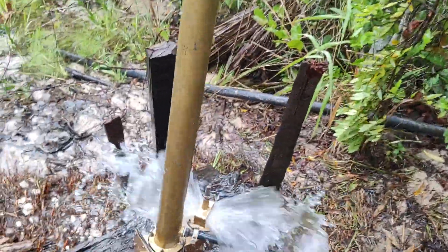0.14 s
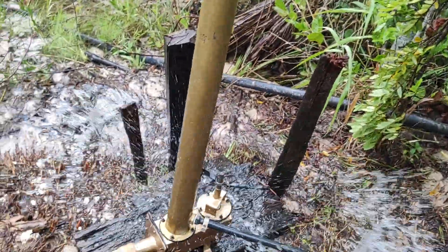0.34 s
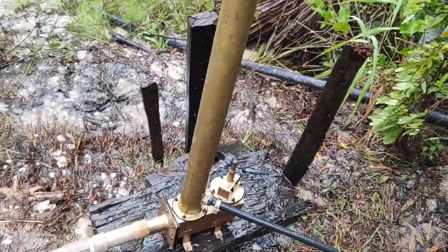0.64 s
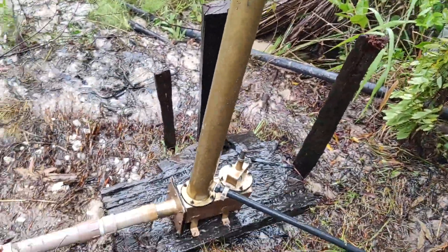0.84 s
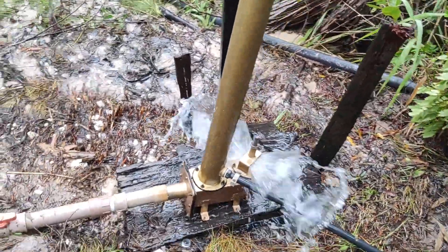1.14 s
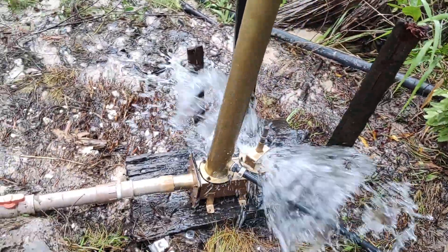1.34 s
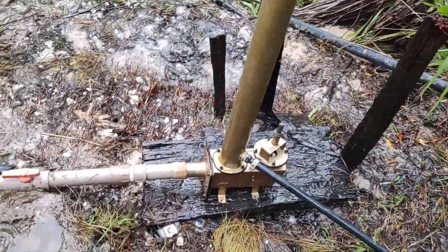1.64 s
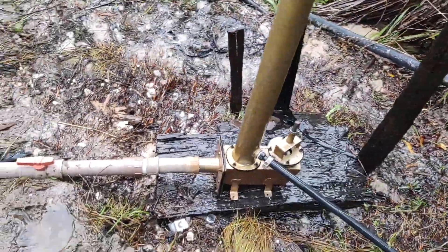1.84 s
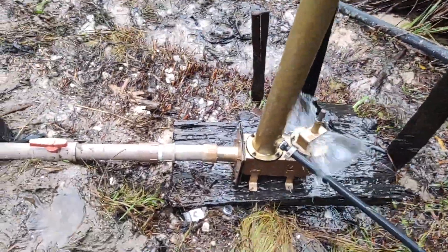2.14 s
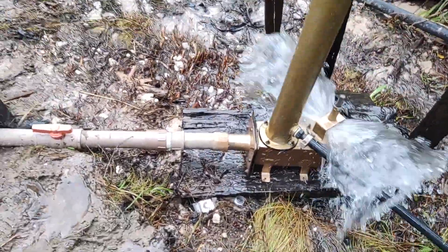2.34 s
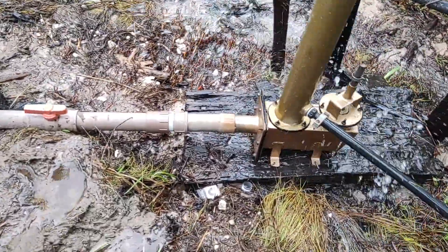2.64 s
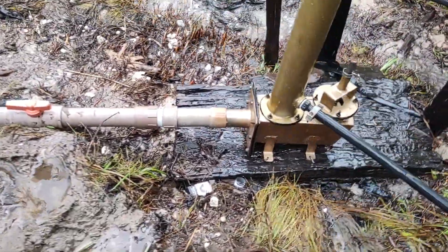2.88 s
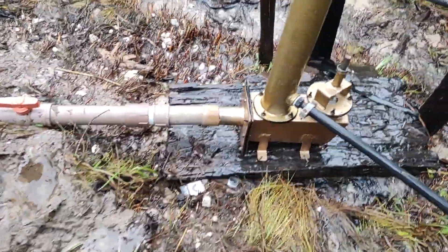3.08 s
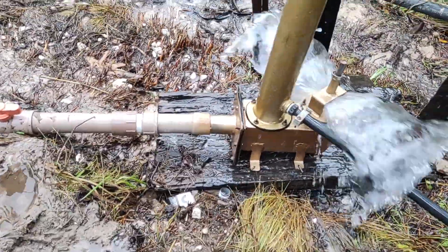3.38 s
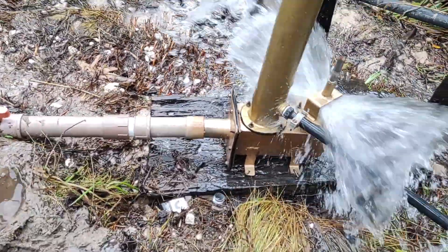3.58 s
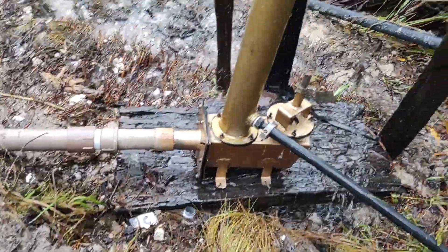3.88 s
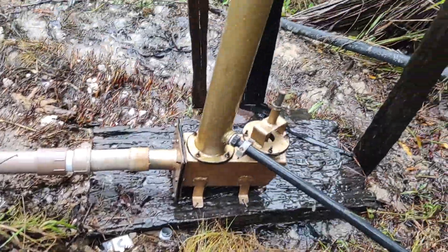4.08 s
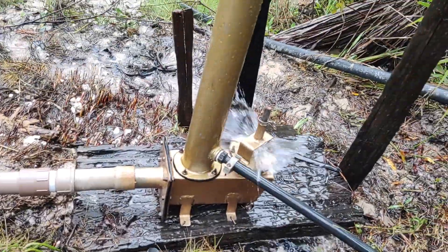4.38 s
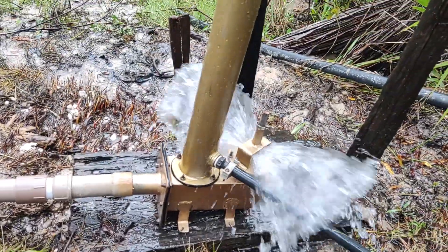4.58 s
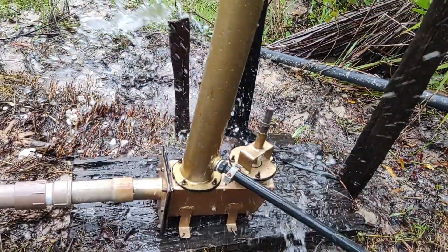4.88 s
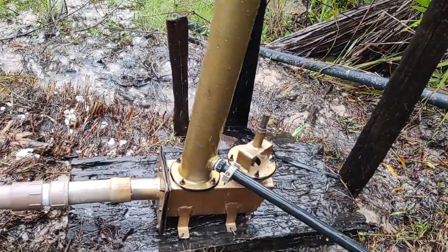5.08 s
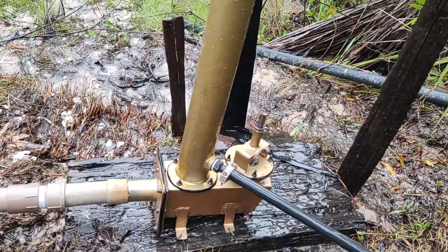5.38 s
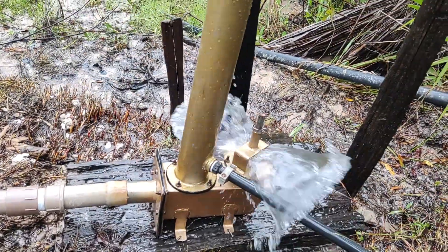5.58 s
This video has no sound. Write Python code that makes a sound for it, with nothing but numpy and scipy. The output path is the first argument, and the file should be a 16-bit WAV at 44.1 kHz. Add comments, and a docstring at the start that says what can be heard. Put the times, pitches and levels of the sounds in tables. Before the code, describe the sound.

A water-driven pump outdoors beats steadily, each cycle a gush of water, a heavy metallic slam, a sharp clack and softening knocks.

```python
"""A hydraulic ram pump beats on wet ground outdoors, about once in 1.13 s.
In each beat water gushes from the waste valve until it slams shut (water hammer); the delivery valve thumps;
the waste valve clacks open, bounces on a pocket of water and lands; the pressure wave then runs to and fro in
the drive pipe, its returns ever sooner and softer. The first return squirts water that splatters down while the
gush builds again. Blows are shaped noise, modes and gliding pockets; water is coloured noise with bubbles."""
import sys
import numpy as np
from scipy import signal
from scipy.fft import rfft, irfft, next_fast_len
from scipy.io import wavfile
from scipy.ndimage import uniform_filter1d, minimum_filter1d, map_coordinates

SR = 44100
rng = np.random.default_rng(int(sys.argv[2]) if len(sys.argv) > 2 else 0)


def wav_record(signal):
    """Record a signal, one row per channel, as 16-bit PCM in the file named by sys.argv[1]."""
    frames = np.transpose(np.atleast_2d(signal))
    bounded = np.clip(frames, -1, 1)
    # unit amplitude maps onto the largest positive 16-bit level
    quanta = np.round(bounded * 32767).astype(np.int16)
    wavfile.write(sys.argv[1], SR, quanta)


N = 252252

# Levels here are reference levels: the functions offset them for the layers of each event.
# waste valve slams shut: start_s, level_db, brightness_db, shake_db (body and plank),
# splash_db and spray_db (strength of this beat's jet), pipe_ring_db
SLAM_EVENTS = [(0.3806, -24, 1.5, -23.5, 2.5, -4, -65), (1.4952, -27.5, -3, -37.5, -.5, -3.5, -63),
               (2.6386, -23, -6, -19, 1.5, -1.5, -54.5), (3.762, -24, 0.5, -34.5, 5, 3.5, -72),
               (4.8973, -21, 0.2, -24, 1.5, 3, -48.5)]
# waste valve drops open on its stop, then bounces once:
# start_s, level_db, brightness_db, bounce_knock_db, bounce_pocket_hz, bounce_pocket_db
CLACK_EVENTS = [(.648, -23.5, 7.5, -33.5, 884, -23.5), (1.764, -25.5, 1.5, -33.5, 930, -33),
                (2.9096, -24.5, -3.5, -29, 832, -19), (4.0256, -24, -4.5, -28.5, 930, -26),
                (5.1637, -25.5, 1, -29.5, 684, -26)]
# valve lands for good and starts the pressure wave: start_s, knock_db, brightness_db, pocket_db
LANDING_EVENTS = [(-.426, -21, 2, -22), (0.7399, -19.5, 4.5, -25.5), (1.8425, -17, 0.5, -21.5),
                  (3.0013, -21, 0, -20.5), (4.1074, -19.5, 0, -22), (5.2564, -20, 4.5, -17.5)]
# first return of the wave along the drive pipe, one row per landing:
# start_s, knock_db, pocket_hz, pocket_over_knock_db
FIRST_RETURN_EVENTS = [(-.252, -31, 800, 2), (0.914, -30.5, 690, -8), (2.0125, -32.5, 824, 3),
                       (3.176, -30, 626, -10), (4.2763, -29.5, 692, -1), (5.43, -30.5, 1110, -5)]
# biggest splats of water: start_s, level_db, pitch_hz
SPLAT_EVENTS = [(0.01, -44.5, 2070), (0.323, -43.5, 3580), (0.769, -35.5, 950), (1.089, -40.5, 820),
                (1.131, -38, 1450), (1.71, -36, 2100), (2.216, -44, 776), (2.239, -43, 976),
                (2.424, -43.5, 3370), (2.938, -40, 1140), (3.208, -41.5, 830), (3.349, -39.5, 3250),
                (3.929, -40, 3300), (3.975, -32.5, 1370), (4.476, -41.5, 1180), (4.5, -42.5, 1100),
                (4.52, -39.5, 730), (5.636, -36.5, 1104), (5.67, -34.5, 2425)]
# drops that land close by: start_s, level_db
DROP_EVENTS = [(2.238, -47.5), (2.7204, -45), (3.063, -48), (4.3846, -54), (4.5024, -48.5), (4.9814, -56)]

# spectral colour of each kind of blow: frequency_hz, level_db (relative, per Hz)
SLAM_COLOUR = [(40, -69), (100, -15.5), (220, -10.5), (290, -0.5), (430, -7), (950, 1), (1500, -7),
               (2600, -9), (4200, -9), (5700, -33), (13500, -31), (15500, -30)]
CLACK_COLOUR = [(50, -29), (190, -20.5), (330, 7), (430, -7.5), (750, -2), (1300, -7), (1900, -3.5),
                (2600, -11.5), (3300, 0.5), (4400, -13.5), (5700, -33), (13500, -38), (15500, -31)]
BOUNCE_COLOUR = [(40, -36), (140, -10), (330, 2), (480, -5), (900, 5.5), (1400, -7.5), (2050, 0.5),
                 (2700, -13.5), (4200, -15), (5400, -37), (9000, -50.5), (15500, -57)]
RETURN_COLOUR = [(50, -46), (150, -9.5), (290, 1), (470, -5), (750, 0), (1150, -1.5), (1400, -11),
                 (2100, -9), (2600, -16), (4200, -19.5), (5500, -44.5), (15500, -51)]
PINCH_COLOUR = [(200, -29), (900, 0), (4300, 8.0), (5700, -16), (13500, -13), (15300, -17)]
PLANK_COLOUR = [(30, -23), (70, -12), (120, -3.0), (190, 0.0), (400, -26), (1000, -36)]
THUMP_COLOUR = [(60, -42), (350, -6.5), (700, -1.0), (2000, -12.5), (4000, -14), (5700, -44.0)]
SPATTER_COLOUR = [(300, -21), (800, 3.5), (1600, -0.5), (3500, -2.0), (4700, -9.5), (5700, -32), (15000, -30)]
SPLAT_COLOUR = [(100, -16.0), (700, -3), (1200, 0), (4000, -1), (5700, -29.5), (15000, -34)]
DROP_COLOUR = [(500, -29), (2000, 6.5), (4200, 8.5), (5700, -9), (9000, -5.0), (15500, -12)]
# churned water in the valve: frequency_hz, level_db (relative, per Hz)
SLOSH_COLOUR = [(100, -53), (450, -17.5), (680, -4), (860, 0), (1080, -4.5), (1400, -11.5), (2200, -15.5),
                (4200, -27.5), (5500, -65), (15000, -69)]
# share of a blow's brightness at each frequency: frequency_hz, share
HARDNESS = [(600, 0), (2500, 1)]

# spectral colour of the running water: frequency_hz, level_db (relative, per Hz)
GURGLE_COLOUR = [(25, -45), (70, -22), (130, -10), (260, -1), (400, -4), (700, 2), (1000, 0), (1500, -23),
                 (2500, -30), (5000, -90)]
SPLASH_COLOUR = [(500, -39), (1100, 5), (1600, -6.5), (2400, -2.5), (3300, 4.5), (4400, 5.5), (5000, -2),
                 (5700, -9), (8000, -18.5)]
SPRAY_COLOUR = [(3060, -23), (5200, -23), (5640, -17.5), (6750, -11), (8370, 0.5), (13000, -2.5),
                (15200, 2.5), (15800, 6), (16200, -10)]
MIST_COLOUR = [(11000, -43), (14000, -17), (15000, 0), (15900, -4), (16400, -25)]
# water trickling away between the beats: frequency_hz, level_db (relative, per Hz)
TRICKLE_COLOUR = [(25, -42), (90, -11), (250, -2), (500, -3.5), (900, 1.5), (1500, -9.5), (3500, -4.5),
                  (4500, -10), (5500, -19.5), (7000, -16), (8000, -22.5), (11000, -35), (15500, -31)]

# modes of the pump body, then of the valve: frequency_hz, level_db, t60_s
BODY_MODES = [(510, -26, 0.25), (552, -12.5, 0.51), (777, -15, 0.083), (807, -15, 0.61)]
VALVE_MODES = [(522, -23.5, 0.7), (566, -10.5, 0.3), (1162, 0.5, 0.14), (1220, -57, 0.035),
               (1277, -5.5, 0.092)]
# stereo width of blows, then of water: frequency_hz, side_over_mid_db
BLOW_SIDE = [(100, -22), (700, -5), (1500, -2.5), (3500, -1), (8000, 0.5)]
WATER_SIDE = [(100, -14), (400, -10), (1000, -4.5), (3000, 0), (8000, 0)]
# decay of the yard's echo: frequency_hz, t60_s
YARD_DECAY = [(100, 0.15), (800, 0.1), (3000, 0.21), (10000, 0.13)]
# treble balance of the microphone ports: frequency_hz, left_minus_right_db
PORT_BALANCE = [(4000, 0), (6000, 0), (8500, 6.0), (10500, -0.5), (13000, -3.5), (16000, -1)]

# each part of the gush swells to full flow, holds, then dies:
# level_db, swell_db_per_s, hold_end_s (after the slam), fall_db_per_s
GURGLE_GUSH = (-52.5, 17.5, 0.19, 144)
SPLASH_GUSH = (-44, 53, 0.3937, 157)
SPRAY_GUSH = (-55, 75, 0.32, 113)
FULL_FLOW_S = 0.054  # before the slam
CHURN_DB, CHURN_LEAD_S, CHURN_SPREAD_S = -38, 0.017, 0.039  # water churns just before the valve lands
SPRAY_FLUTTER_DB, SPRAY_PATCHY_DB = 1.5, 1.6

BLOW_S = .025  # a blow's level is its energy spread over this time
PIPE_HZ, PIPE_T60_S = 516.8, 4.3
THUMP_AFTER_S = .1505  # one trip of the pressure wave after the slam
THUMP_DB, THUMP_RING_DB = -35, -44
CRACK_DB = -11  # first instant of a clack, against the whole blow
CLACK_RING_DB = -20.5
BOUNCE_AFTER_S, BOUNCE_BRIGHT_DB = .0475, 0.2  # delay after the clack
LANDING_POCKET_HZ = 817.4

RETURN_COUNT = 4
ROUND_TRIP_S, GAP_SHRINK = .127, .67  # the gap between returns shrinks towards the pipe's round trip
RETURN_LOSS_DB = 7.5  # for each doubling of the number of trips
RETURN_BRIGHT_DB, RETURN_DULLING_DB = -1, 9  # first knock; treble lost on each trip
RETURN_POCKET_HZ = 728  # of the later returns
LATER_POCKET_DB, POCKET_LOSS_DB = -9, 3.5  # later pockets over their knock; extra loss on each trip
SPATTER_LOSS_DB = 1.5  # extra loss on each trip

SHOWER_AFTER_S, SHOWER_SPREAD_S = .385, .026  # the squirt comes down, after the valve lands
SHOWER_DB, SHOWER_SPLAT_DB, SHOWER_DROP_DB = -50.5, -45.5, -55
SPLAT_HZ, SPLAT_SCATTER_OCT, SPLAT_SWELL_S = 1698, 0.713, 0.0018
STRAY_SPLAT_DB, STRAY_SPLAT_HZ = -49.5, 3260  # lesser ones fall at any time
WET_SCATTER_DB = 1.5  # random spread of small splats and drops

PEAK_LIMIT = 0.7  # peaks above this are turned down
TOP_HZ = 16250  # band limit


def amp(db):
    """Decibel law: level to amplitude ratio."""
    return 10 ** (np.asarray(db) / 20)


def unit(x):
    """Normalisation to rms 1."""
    return x / np.sqrt(np.mean(x ** 2) + 1e-20)


def sized(x, db):
    """Energy scaling: the blow's energy, spread over BLOW_S, has this level."""
    energy = np.mean(np.sum(x ** 2, axis=-1))
    return amp(db) * x / np.sqrt(energy / (BLOW_S * SR) + 1e-20)


def along(points, hz):
    """Interpolation of (frequency, value) points on a logarithmic axis."""
    f, v = np.transpose(points)
    return np.interp(np.log(hz + 1), np.log(f + 1), v)


def wobble(rate):
    """Band-limited random fluctuation: a smooth curve with rate knots a second."""
    knots = rng.standard_normal(int(N * rate / SR) + 4)
    return map_coordinates(knots, [np.arange(N) * rate / SR])


def clock(size=8192):
    """Conjugate time and frequency axes of one short event."""
    return np.arange(size) / SR, np.fft.rfftfreq(size, 1 / SR)


def add(track, s, x):
    """Superposition: mix x into the track at time s."""
    start = round(s * SR)
    if 0 <= start < N:
        track[:, start:start + x.shape[-1]] += x[..., :N - start]


def filtered(x, response):
    """Linear filtering: the spectrum of x times a response of frequency."""
    m = next_fast_len(N + SR // 2)
    return irfft(rfft(x, m) * response(np.fft.rfftfreq(m, 1 / SR)), m)[..., :N]


def causal(gain):
    """Minimum phase: the response with this gain that rings only after its cause."""
    cepstrum = irfft(np.log(np.maximum(gain, 1e-6)))
    half = cepstrum.shape[-1] // 2
    cepstrum[..., 1:half] *= 2
    cepstrum[..., half + 1:] = 0
    return np.exp(rfft(cepstrum))


def left_right(mid, side):
    """Sum and difference stereo, decoded to left and right."""
    return np.array([mid + side, mid - side])


def burst(colour_db, db, swell, tail_db, tail_t60):
    """Impact noise: a stereo cluster of tiny hits swells and dies, ringing with the given colour."""
    t, hz = clock()
    swell = max(swell, 1e-4)
    onset = t / swell * np.exp(1 - t / swell)
    tail = amp(tail_db - 60 * t / tail_t60) * (1 - np.exp(-t / swell))
    hits = rfft((onset + tail) * rng.standard_normal((2, len(t))))
    # flatten the broad spectrum of the hits before colouring them
    broad = np.sqrt(np.abs(uniform_filter1d(np.abs(hits) ** 2, size=50, axis=1)) + 1e-9)
    width = amp([0 * hz, along(BLOW_SIDE, hz)])
    mid, side = irfft(hits * causal(amp(colour_db) / broad) * width)
    return left_right(mid, side) * amp(db) / np.sqrt(np.sum(mid ** 2) / (BLOW_S * SR))


def knock(colour, db, bright_db, swell, tail_db, tail_t60):
    """Contact stiffness: a harder blow on the pump lifts the treble."""
    _, hz = clock()
    colour_db = along(colour, hz) + bright_db * along(HARDNESS, hz)
    return burst(colour_db, db, swell, tail_db, tail_t60)


def pocket(hz, db, swell, glide):
    """Bubble resonance: an air pocket swells into a short note, rising as it shrinks."""
    t, _ = clock()
    u = t / swell
    pitch = hz * (1 + glide * np.tanh((u - 1) / 2))
    tone = np.sin(2 * np.pi * np.cumsum(pitch) / SR)
    return sized(u ** 2 * np.exp(-2 * u) * tone, db)


def ring(modes, db):
    """Modal vibration: damped metal modes, struck at slightly new strengths each time."""
    t = np.arange(SR) / SR
    total = np.zeros(SR)
    for hz, level, t60 in modes:
        decay = amp(db + level + rng.normal() - 60 * t / t60)
        total += decay * np.sin(2 * np.pi * (hz * t + rng.random()))
    return total * (1 - np.exp(-t / 0.0011))


def bubbles(rate, centre_hz, spread, cycles, size_db, size=400):
    """Damped bubble oscillation: a stereo rain, rms 1; spread in octaves each way, cycles to decay."""
    count = int(rate * N / SR)
    when, pitch, strength, place = rng.random((count, 4)).T[:, :, None]
    t = np.arange(size) / SR
    turns = centre_hz * 2 ** (spread * (2 * pitch - 1)) * t
    strengths = amp(-size_db * np.log(np.maximum(strength, .01)))
    grains = strengths * np.exp(-turns / cycles) * np.sin(2 * np.pi * turns)
    index = ((when * N).astype(int) + np.arange(size)).ravel()
    mid_gain = np.cos(place * np.pi / 2)
    side_gain = np.sin(place * np.pi / 2) * rng.choice([-1, 1], (count, 1))
    return unit(np.array([np.bincount(index, (grains * g).ravel(), N)[:N] for g in (mid_gain, side_gain)]))


def water(colour, grains, grain_db, patchy_db):
    """Turbulence: rushing noise, patchy in time and frequency, with bubbles on it; mid rms 1."""
    z = signal.stft(rng.standard_normal((2, N)), nperseg=512)[2]
    field = uniform_filter1d(rng.standard_normal(z.shape[1:]), size=7, axis=0)
    field = uniform_filter1d(field, size=4, axis=1)
    rush = unit(signal.istft(z * amp(patchy_db * unit(field)), nperseg=512)[1][:, :N])

    def response(hz):
        return amp(along(colour, hz)) * amp([0 * hz, along(WATER_SIDE, hz)])

    mid, side = filtered(rush + amp(grain_db) * grains, response)
    return left_right(mid, side) / np.std(mid)


def flow(level_db, swell_db_per_s, hold_s, fall_db_per_s, splash_share=0, spray_share=0):
    """Power summation over all beats: the gain of one part of the gush swells, holds and falls."""
    power = np.zeros(N)
    for s, *_, splash_db, spray_db, _ in SLAM_EVENTS:
        t = np.arange(N) / SR - s
        sag_db = swell_db_per_s * np.maximum(-t - FULL_FLOW_S, 0) + fall_db_per_s * np.maximum(t - hold_s, 0)
        power += amp(level_db + splash_share * splash_db + spray_share * spray_db - sag_db) ** 2
    return np.sqrt(power)


def surge(db, after_s, spread_s):
    """Gaussian pulse: gain of a surge of water, timed from each landing of the valve."""
    t = np.arange(N) / SR
    return amp(db) * sum(np.exp(-.5 * ((t - s - after_s) / spread_s) ** 2) for s, *_ in LANDING_EVENTS)


def shower(count):
    """Normal scatter: random times at which count blobs of each squirt come down."""
    falls = [s + SHOWER_AFTER_S + SHOWER_SPREAD_S * rng.standard_normal(count) for s, *_ in LANDING_EVENTS]
    return np.concatenate(falls)


def strays(count):
    """Stratified chance: random times spread loosely over the whole scene."""
    return (np.arange(count) + rng.random(count)) / count * N / SR


def yard(x):
    """Diffuse reverberation: ground and bushes scatter a short answer."""
    hz, t, z = signal.stft(rng.standard_normal((2, SR // 3)), SR, nperseg=256)
    decay = amp(-60 * t / along(YARD_DECAY, hz)[:, None])
    tail = signal.istft(z * decay, SR, nperseg=256)[1]
    late = np.pad(x, ((0, 0), (SR // 125, 0)))  # 8 ms later
    return signal.fftconvolve(late, tail / np.linalg.norm(tail[0]), axes=1)[:, :N]


def trickle():
    """Bubble noise: spilled water keeps running and dripping off the plank."""
    drips = bubbles(300, centre_hz=2235, spread=1.256, cycles=5.6, size_db=5.5)
    return amp(-56.5 + wobble(26)) * water(TRICKLE_COLOUR, drips, grain_db=-9.0, patchy_db=3.5)


def drops():
    """Drop impact: a near drop lands with a thin tick; fainter ones fall in the showers."""
    out = np.zeros((2, N))
    faint = [(s, SHOWER_DROP_DB + WET_SCATTER_DB * rng.normal()) for s in shower(count=2)]
    for s, db in DROP_EVENTS + faint:
        add(out, s, knock(DROP_COLOUR, db, 0, swell=0.0012, tail_db=-4, tail_t60=0.061))
    return out


def pipe_ring():
    """Light damping: each slam strikes one mode of the pipe, which sings on until the next."""
    t = np.arange(N) / SR
    gain = np.zeros(N)
    for s, *_, ring_db in SLAM_EVENTS:
        gain = np.where(t < s, gain, amp(ring_db - 60 * np.abs(t - s) / PIPE_T60_S))
    gain = np.sqrt(2) * uniform_filter1d(gain, size=441) * amp(1.6 * wobble(9.8))
    return gain * np.sin(2 * np.pi * PIPE_HZ * t)


def splats():
    """Entrained bubbles: each spit or landing blob gives a short splash and a rising note."""
    out = np.zeros((2, N))
    _, hz = clock()
    wet = along(SPLAT_COLOUR, hz)
    small = [(s, SHOWER_SPLAT_DB, SPLAT_HZ) for s in shower(count=3)]
    small += [(s, STRAY_SPLAT_DB, STRAY_SPLAT_HZ) for s in strays(count=16)]
    scattered = []
    for s, db, pitch_hz in small:
        octaves = SPLAT_SCATTER_OCT * rng.uniform(-1.014, 1)
        scattered.append((s, db + WET_SCATTER_DB * rng.normal(), pitch_hz * 2 ** octaves))
    for s, db, pitch_hz in SPLAT_EVENTS + scattered:
        bubble_db = 13 * np.exp(-(np.log2((hz + 1) / pitch_hz) / 0.31) ** 2)
        add(out, s - .001, burst(wet + bubble_db, db - 2.0, SPLAT_SWELL_S, tail_db=-11, tail_t60=0.11))
        add(out, s, pocket(pitch_hz, db - 8.5, swell=0.0036, glide=0.19))
    return out


def gush():
    """Jet break-up: water gurgles at the valve, splashes on the ground and turns to spray and mist."""
    low = np.hypot(flow(*GURGLE_GUSH), surge(CHURN_DB, -CHURN_LEAD_S, CHURN_SPREAD_S))
    falling = surge(SHOWER_DB, SHOWER_AFTER_S, SHOWER_SPREAD_S)
    middle = np.hypot(flow(*SPLASH_GUSH, splash_share=0.33), falling)
    # a stronger jet makes finer mist: the top grows faster with its strength
    high = flow(*SPRAY_GUSH, spray_share=0.64)
    top = flow(*SPRAY_GUSH, spray_share=1.5)
    flutter = wobble(45)  # shared by splash, spray and mist

    glugs = bubbles(250, centre_hz=802, spread=1.05, cycles=8.4, size_db=4.5)
    gurgle = water(GURGLE_COLOUR, glugs, grain_db=-17.0, patchy_db=5.0)
    gurgle = low * amp(-0.5 + 0.49 * wobble(24)) * gurgle

    fizz = bubbles(1200, centre_hz=2700, spread=.9, cycles=3, size_db=4)
    splash = water(SPLASH_COLOUR, fizz, grain_db=-3.5, patchy_db=3.5)
    splash = middle * amp(-1.0 + 2.9 * flutter) * splash

    droplets = bubbles(1400, centre_hz=8700, spread=1.0, cycles=0.94, size_db=6.5)
    spray = water(SPRAY_COLOUR, droplets, grain_db=-4.0, patchy_db=SPRAY_PATCHY_DB)
    spray = high * amp(-.7 + SPRAY_FLUTTER_DB * wobble(130) + 0.89 * flutter) * spray

    specks = bubbles(500, centre_hz=14500, spread=0.13, cycles=3.3, size_db=8)
    mist = water(MIST_COLOUR, specks, grain_db=-5, patchy_db=0.0)
    mist = top * amp(-12 + 1.5 * flutter) * mist
    return gurgle + splash + spray + mist


def returns():
    """Wave reflection: each return comes sooner and knocks softer and duller, with a weaker spatter."""
    out = np.zeros((2, N))
    for (landing_s, *_), (s, first_db, first_hz, pocket_over_db) in zip(LANDING_EVENTS, FIRST_RETURN_EVENTS):
        gap_s = s - landing_s
        for trip in range(RETURN_COUNT):
            db = first_db - RETURN_LOSS_DB * np.log2(trip + 1)
            bright_db = RETURN_BRIGHT_DB - RETURN_DULLING_DB * trip
            spatter_db = db - 11 - SPATTER_LOSS_DB * trip
            hz = RETURN_POCKET_HZ if trip else first_hz
            pocket_db = db + (LATER_POCKET_DB - POCKET_LOSS_DB * trip if trip else pocket_over_db)
            # the water stirs just ahead of the knock
            add(out, s - .009, pocket(hz, pocket_db - 16, swell=0.0074, glide=0.033))
            add(out, s, knock(RETURN_COLOUR, db, bright_db, swell=0.0019, tail_db=-3.0, tail_t60=0.089))
            add(out, s, pocket(hz, pocket_db, swell=0.0036, glide=0.25))
            spatter = knock(SPATTER_COLOUR, spatter_db, bright_db=-2.5, swell=0.017, tail_db=-30, tail_t60=.1)
            add(out, s + .012, spatter)
            gap_s = ROUND_TRIP_S + (gap_s - ROUND_TRIP_S) * GAP_SHRINK
            s += gap_s
    return out


def bounces():
    """Pocket resonance: the valve bounces, then lands; each blow's pocket rebounds higher in churning water."""
    out = np.zeros((2, N))
    blows = [(s + BOUNCE_AFTER_S, db, BOUNCE_BRIGHT_DB, hz, pocket_db)
             for s, _, _, db, hz, pocket_db in CLACK_EVENTS]
    blows += [(s, db, bright_db, LANDING_POCKET_HZ, pocket_db)
              for s, db, bright_db, pocket_db in LANDING_EVENTS]
    for s, db, bright_db, hz, pocket_db in blows:
        # water squeezed ahead of the blow
        squeeze = knock(SLOSH_COLOUR, db - 9.5, bright_db=3, swell=0.0081, tail_db=-25, tail_t60=.05)
        add(out, s - .012, squeeze)
        add(out, s, knock(BOUNCE_COLOUR, db - .8, bright_db, swell=0.0018, tail_db=-28, tail_t60=0.019))
        add(out, s, pocket(hz, pocket_db, swell=0.0041, glide=0.14))
        add(out, s + .011, pocket(hz * 1.08, db - 14, swell=0.0048, glide=0.25))
        churn = knock(SLOSH_COLOUR, db=-34.0, bright_db=-1.5, swell=0.0096, tail_db=-25, tail_t60=.08)
        add(out, s + .006, churn)
    return out


def clacks():
    """Metal impact: a sharp crack excites the valve's modes."""
    out = np.zeros((2, N))
    for s, db, bright_db, *_ in CLACK_EVENTS:
        add(out, s, knock(CLACK_COLOUR, db, bright_db, swell=0.002, tail_db=-4, tail_t60=0.07))
        crack = knock(CLACK_COLOUR, db + CRACK_DB, bright_db + 0.5, swell=0.00043, tail_db=-30, tail_t60=.02)
        add(out, s + .001, crack)
        add(out, s + 0.00097, ring(VALVE_MODES, CLACK_RING_DB))
    return out


def thumps():
    """Air-vessel compliance: water surges in, then the delivery valve thumps shut and faintly rings the metal."""
    out = np.zeros((2, N))
    for slam_s, *_ in SLAM_EVENTS:
        s, db = slam_s + THUMP_AFTER_S, THUMP_DB
        add(out, s - .04, pocket(hz=95.8, db=db - 17.5, swell=0.025, glide=0.082))
        add(out, s, pocket(hz=291.0, db=db + 0.5, swell=0.0042, glide=0.31))
        add(out, s - .002, pocket(hz=183.0, db=db - 8.5, swell=0.0065, glide=.05))
        add(out, s, knock(THUMP_COLOUR, db - 6.5, 0, swell=0.0075, tail_db=-4, tail_t60=0.16))
        add(out, s, ring(VALVE_MODES, THUMP_RING_DB))
    return out


def slams():
    """Water hammer: the valve pinches the jet to a hiss, slams, rings the body and shakes the plank beneath."""
    out = np.zeros((2, N))
    _, hz = clock()
    plank = along(PLANK_COLOUR, hz)
    for s, db, bright_db, shake_db, _, spray_db, _ in SLAM_EVENTS:
        hiss = knock(PINCH_COLOUR, db=-39.5, bright_db=spray_db, swell=0.0084, tail_db=-25, tail_t60=.05)
        add(out, s - .011, hiss)
        add(out, s - .0005, knock(SLAM_COLOUR, db, bright_db, swell=0.0037, tail_db=-2, tail_t60=0.12))
        add(out, s, ring(BODY_MODES, shake_db - 5.5))
        add(out, s + .008, burst(plank, shake_db - 18, swell=0.015, tail_db=-20, tail_t60=0.24))
    return out


def scene():
    """Superposition of the water, the pump's blows and their echo."""
    background = trickle() + drops() + pipe_ring() + gush()
    pump = splats() + returns() + bounces() + clacks() + thumps() + slams()
    return background + pump + amp(-15.5) * yard(pump)


def record(dry):
    """Peak limiting and band limiting; the two microphone ports colour the treble differently."""
    needed = 1 / np.maximum(np.abs(dry).max(axis=0) / PEAK_LIMIT, 1)
    gain = uniform_filter1d(minimum_filter1d(needed, size=180), size=180)

    def ports(hz):
        return amp(np.outer([.5, -.5], along(PORT_BALANCE, hz))) * (hz < TOP_HZ)

    return filtered(dry * gain, ports)


dry = scene()
out = record(dry)
wav_record(out)
```